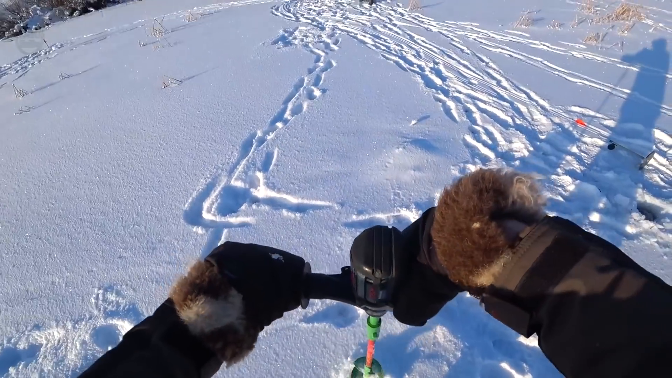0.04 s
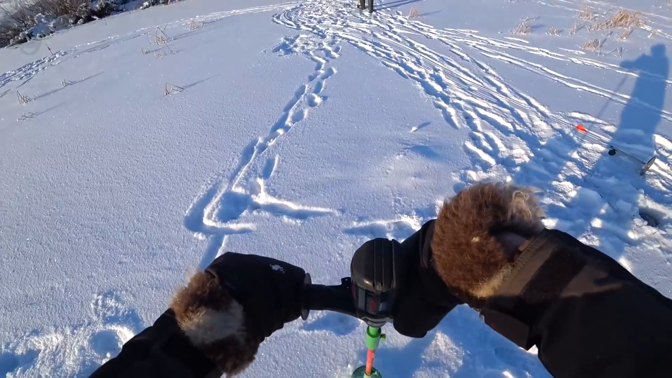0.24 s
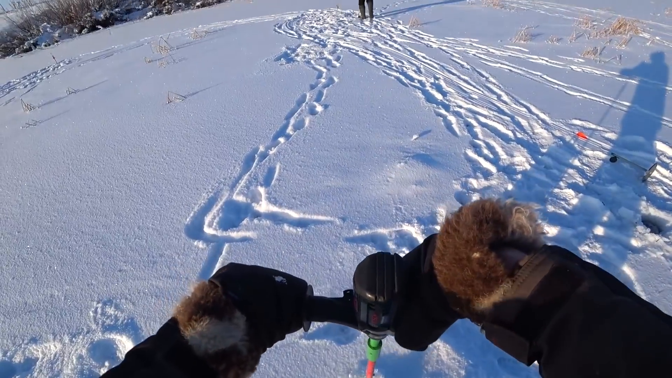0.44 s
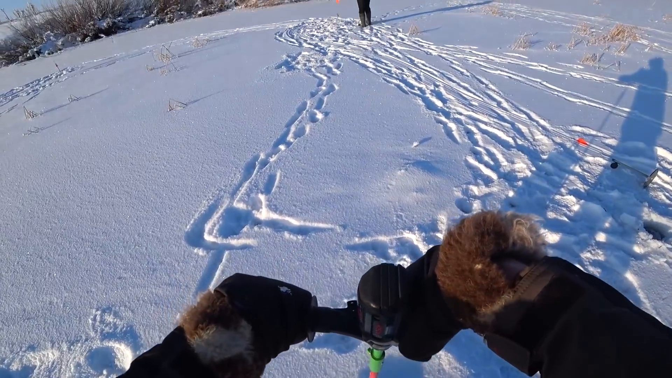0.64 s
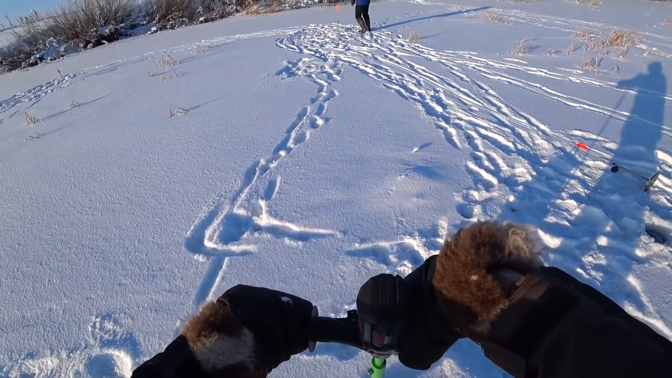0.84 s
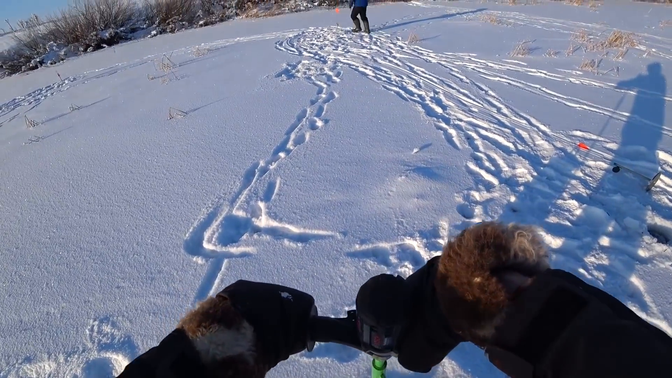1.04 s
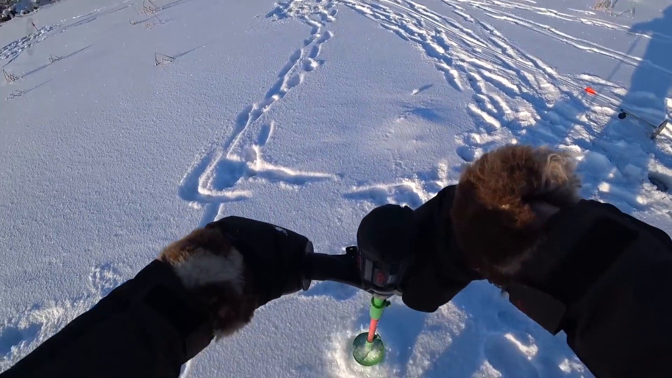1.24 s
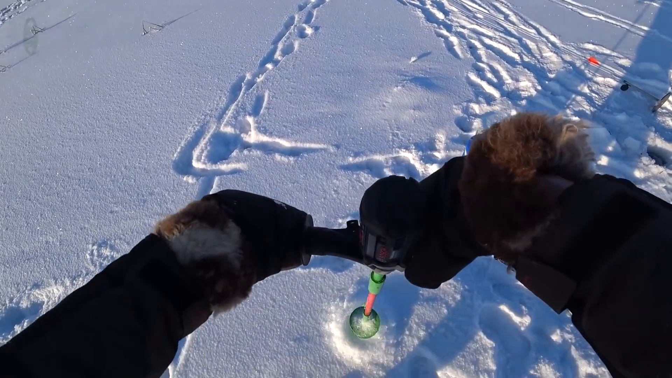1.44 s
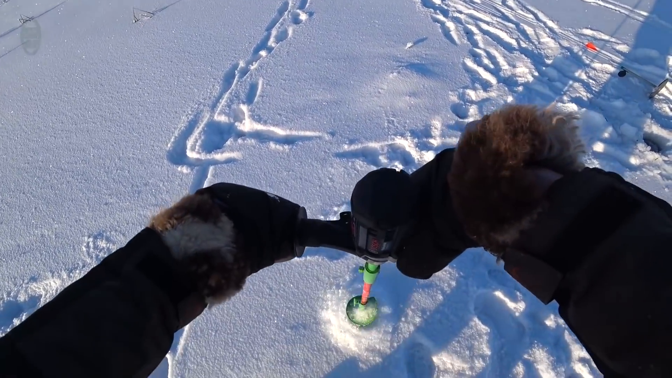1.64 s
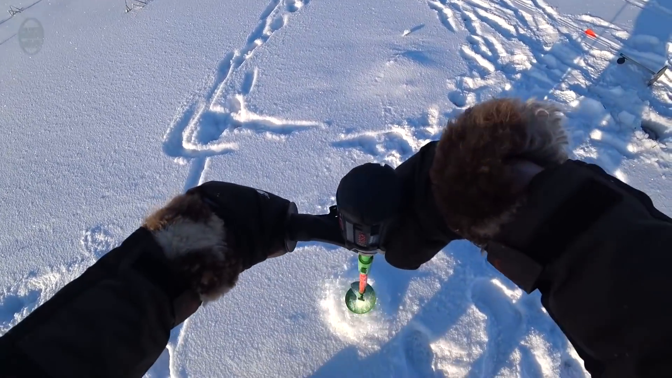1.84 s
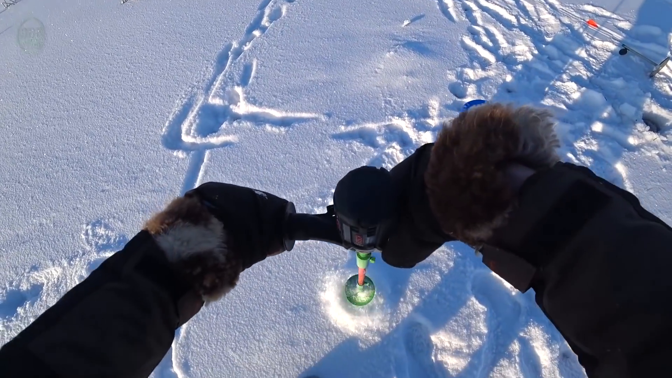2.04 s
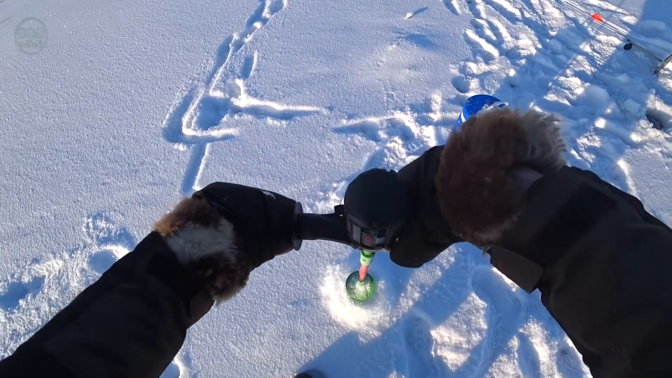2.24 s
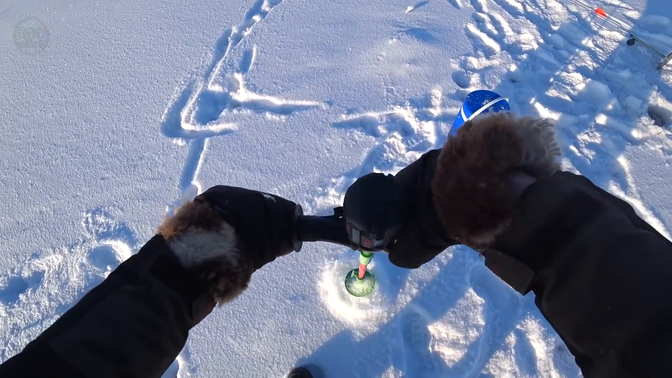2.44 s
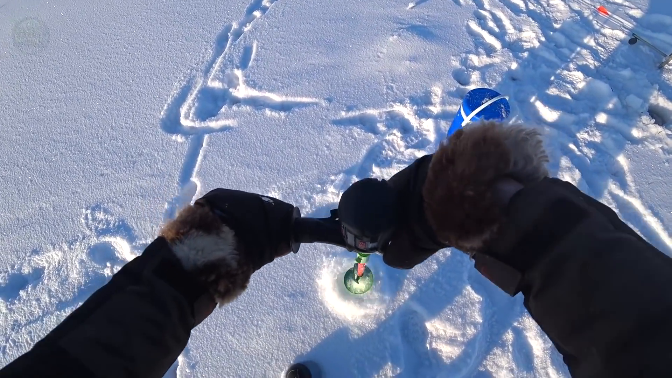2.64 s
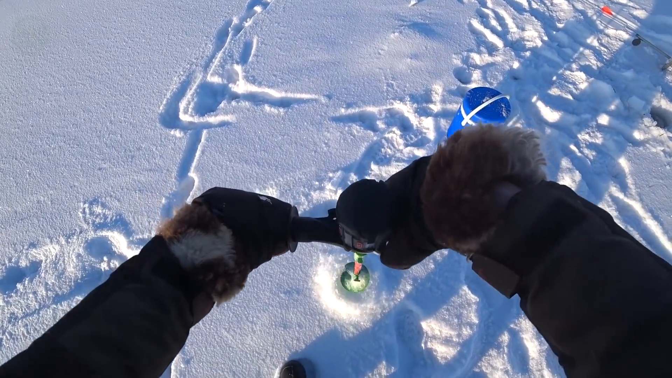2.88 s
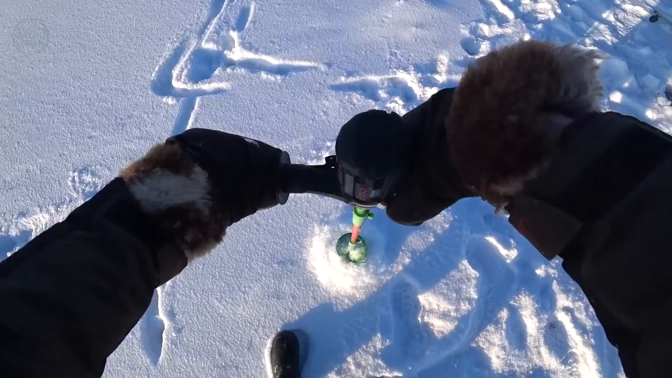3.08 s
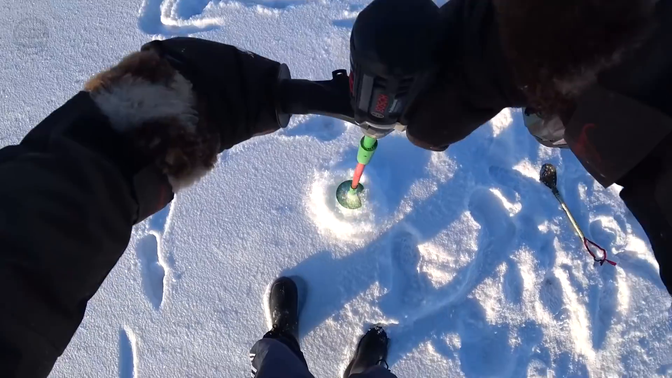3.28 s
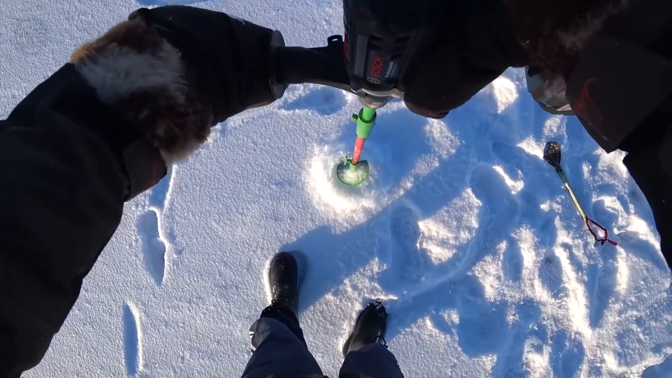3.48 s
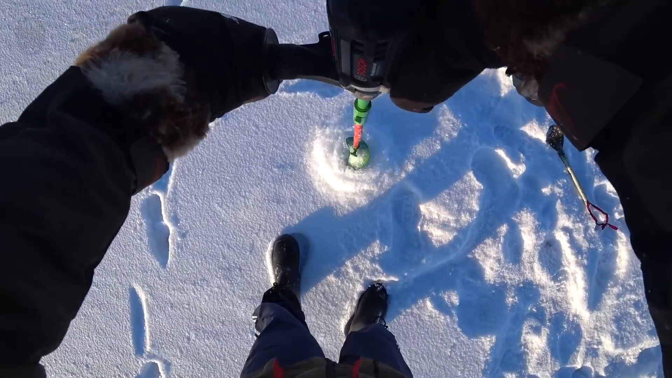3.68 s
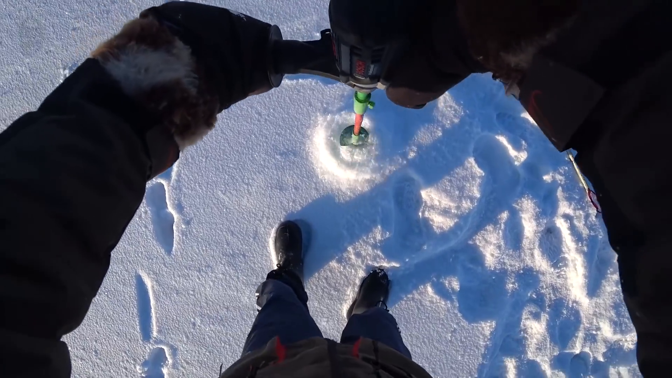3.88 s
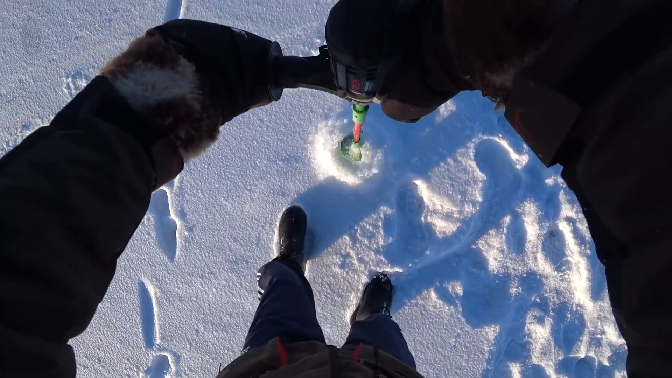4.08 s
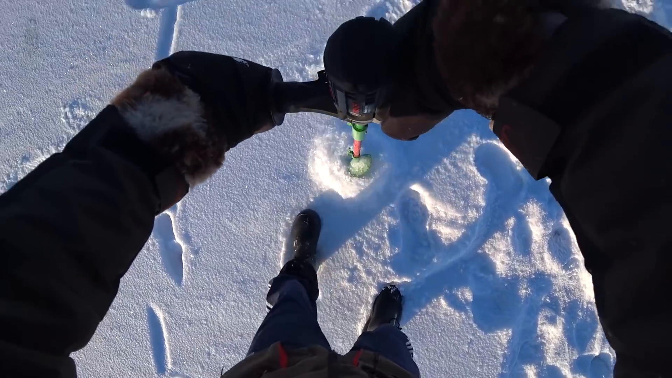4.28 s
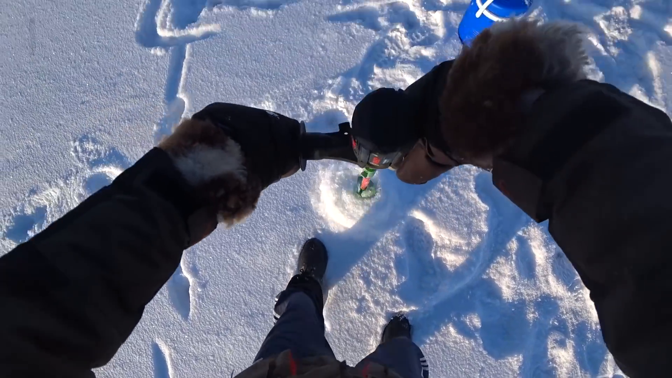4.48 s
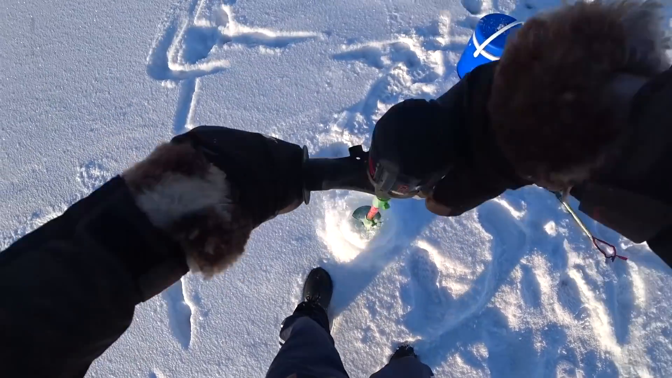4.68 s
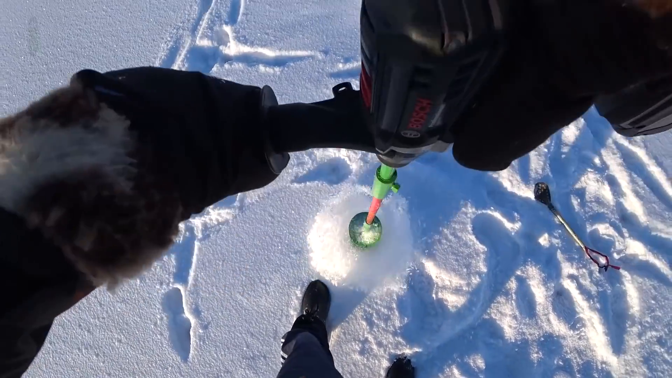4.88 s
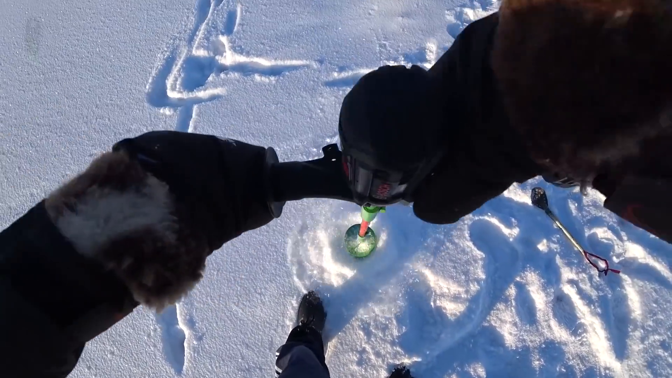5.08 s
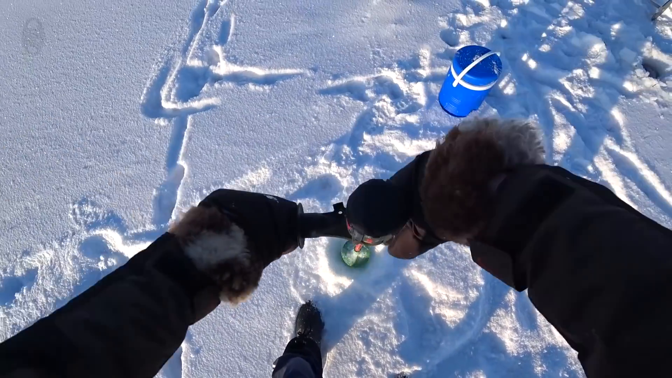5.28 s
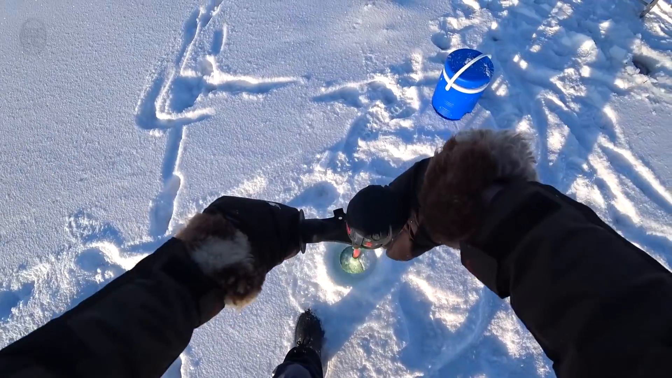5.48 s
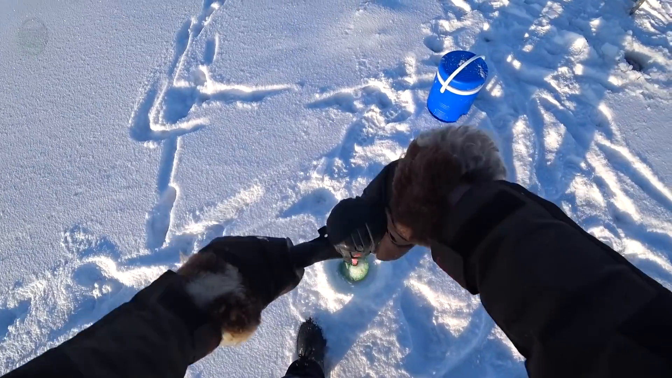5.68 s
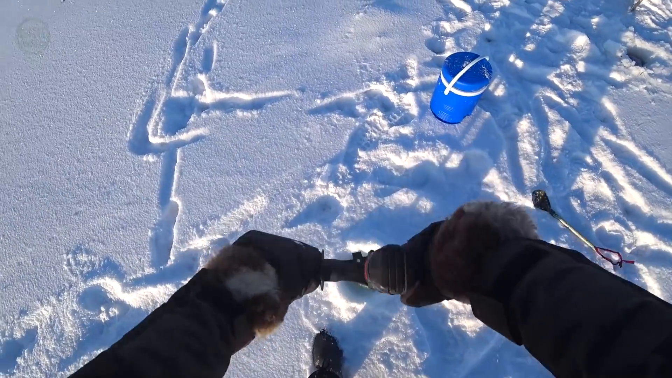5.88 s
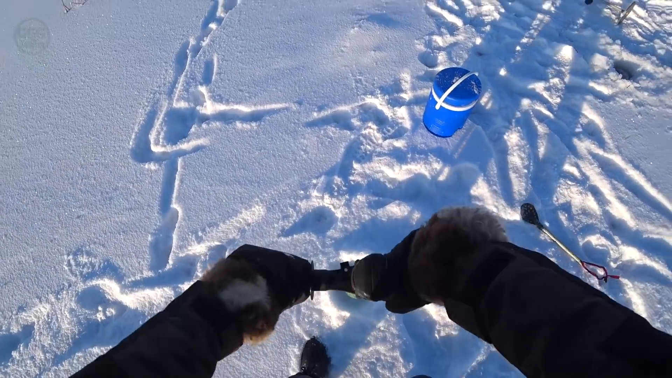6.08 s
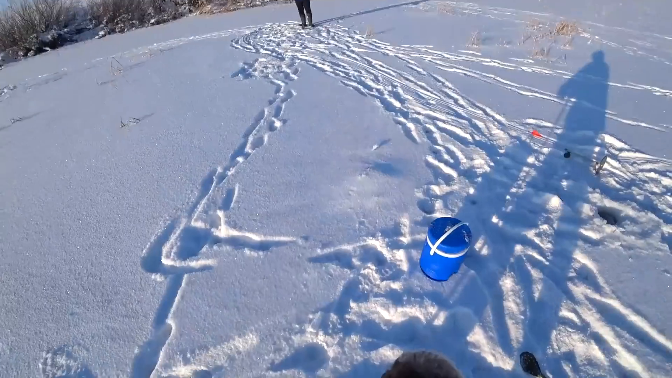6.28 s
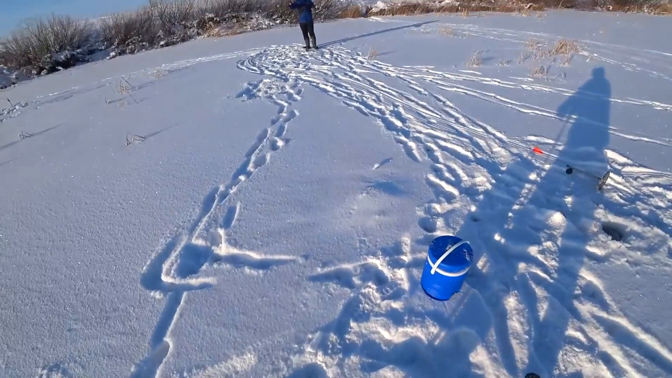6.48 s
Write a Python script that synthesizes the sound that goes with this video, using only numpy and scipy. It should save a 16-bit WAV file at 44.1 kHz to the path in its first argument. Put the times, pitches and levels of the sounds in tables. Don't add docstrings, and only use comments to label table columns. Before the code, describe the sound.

Close, gritty drilling into ice with a singing gear whine speeds up, drops and stops abruptly, leaving a short squeak, clicks and soft crunching snow.

```python
import sys
import numpy as np
from scipy import signal
from scipy.fft import rfft, irfft, next_fast_len
from scipy.io import wavfile
from scipy.ndimage import uniform_filter1d

SR = 44100
rng = np.random.default_rng(int(sys.argv[2]) if len(sys.argv) > 2 else 0)


def master_out(mix):
    frames = np.transpose(np.atleast_2d(mix))
    ceiling = np.clip(frames, -1, 1)
    pcm = np.round(ceiling * 32767).astype(np.int16)
    wavfile.write(sys.argv[1], SR, pcm)


def makeup_ratio(level_db):
    decades = np.asarray(level_db, float) / 20
    return 10 ** decades


N = 287964

# (frequency [Hz], level per Hz [dB])
WIND_COLOUR = [(8, 0), (22, -1), (45, -9), (90, -19), (180, -34), (400, -70)]
SHEET_COLOUR = [(50, -20), (90, -6), (128, 0), (165, -6), (215, -28)]
# (time [s], peak level [dB], length [s])
GUSTS = [(.08, -48, 0.1), (.34, -44, .03), (.7, -47, 0.095), (.92, -45, .06), (1.304, -42, .03),
         (1.5, -39, 0.037), (1.65, -46, .03), (1.75, -55, .04), (2.445, -43, 0.047), (2.942, -41, 0.051),
         (3.18, -51, .04), (3.497, -55, .1), (3.853, -41, .06), (4.09, -41, 0.14), (4.437, -40.5, 0.13),
         (4.634, -46, .03), (4.74, -32, 0.046), (4.86, -39, .05), (5.0, -43, .04), (5.173, -31, .03),
         (5.26, -26, .03), (5.358, -35, 0.035), (5.54, -41, 0.086), (5.86, -54, .04), (5.97, -45, 0.1),
         (6.4, -51, 0.11)]
BREEZE_DB, SHEET_DB = -61, -49.5

# (time [s], level [dB])
RUSTLE = [
    (5.75, -25),
    (5.775, -29.5),
    (6.015, -30.5),
    (6.1, -41.5),
    (6.27, -37),
    (6.33, -38),
    (6.385, -48),
    (6.42, -44),
    (6.53, -50),
]
# (frequency [Hz], level per Hz [dB])
SLUSH_COLOUR = [(59, -33), (100, -17), (671, -10), (1030, -15), (1440, -5), (1690, -5), (2360, -6.5),
                (2760, -6.5), (4510, -14), (5930, -32), (7360, -35), (8280, -29), (10900, -37),
                (14200, -72), (22000, -120)]
SNOW_COLOUR = [(59, -43), (100, -11), (167, -14), (199, -7), (312, 1), (403, -5), (770, -3.5), (1050, -11),
               (1190, -12), (2060, -16), (3230, -11.5), (4970, -22.5), (10900, -22), (14200, -55),
               (22000, -120)]
SETTLED_S = 6.06
RUSTLE_LOW_DB, RUSTLE_FIZZ_DB = (-9, -6.5), (-16.5, -18)

# (time [s], frequency [Hz], level [dB])
SQUEAK = [
    (5.81, 1960, -36),
    (5.83, 1930, -28),
    (5.88, 1830, -28),
    (5.91, 1770, -32),
]
# (time [s], peak level [dB], ring frequency [Hz], bright level [dB], low level [dB])
CLICKS = [(5.7194, -11, 3400, -19, -13), (5.7254, -5, 2220, -17, -23), (5.7533, -12, 1790, -18, -30),
          (5.7997, -8.5, 2730, -15.5, -47), (5.9036, -26, 2350, -12, -25), (5.9073, -10.5, 2420, -14, -38),
          (5.935, -17, 1460, -16.5, -25), (5.9552, -16, 2350, -27, -11), (5.999, -18, 2320, -32, -24),
          (6.021, -16.5, 1420, -30, -14), (6.044, -27, 3180, -28, -6), (6.274, -29, 3780, -25, -3),
          (6.304, -32, 2300, -24, -4), (6.3277, -23, 3600, -14, -20), (6.344, -29.5, 2070, -26, -6),
          (6.3997, -23.5, 3180, -30, -32), (6.404, -26, 3250, -27, -31), (6.448, -29, 3270, -27, -25),
          (6.472, -39, 3700, -27, -6)]
CLICK_S = 0.003
JOLT_S, JOLT_DB, JOLT_HZ, JOLT_LENGTH_S = 5.742, -28, 100, 0.011
CATCH_S, CATCH_LENGTH_S, CATCH_HZ, CATCH_DB = 5.07, 0.013, 2650, -16

# (time [s], speed [Hz])
MOTOR = [(0, 259.5), (1.2, 255.8), (1.95, 250.3), (4.27, 248.8), (4.375, 243), (4.44, 248.5), (4.56, 252.6),
         (4.605, 258), (4.68, 281), (4.8, 293.4), (4.97, 299.3), (5.0, 293.5), (5.1, 298.9), (5.325, 303.3),
         (5.37, 287.5), (5.42, 286.5), (5.52, 259.5), (5.7, 250.3)]
FREE_FROM_HZ, FREE_AT_HZ = 260, 280
BRAKE_S, STOP_S, BRAKE_HZ, BRAKE_DB = 5.7, 5.755, 50, -10
# (time [s], depth of hole [0-1])
BORE = [
    (0, 0.1),
    (1.13, 0.13),
    (1.35, 0.56),
    (2.95, 0.61),
    (3.15, 0.91),
    (4.5, 0.86),
    (4.64, .7),
    (5.42, 0.72),
    (5.75, 0.65),
]

# (frequency [Hz], level per Hz [dB])
SHALLOW_COLOUR = [(140, -28), (240, -38.5), (341, -15), (559, -14.5), (1010, -13), (1280, -14.5),
                  (1910, -8), (2550, 0.5), (3240, -7), (3740, -5.5), (4390, -14.5), (7200, -29),
                  (8310, -25), (10900, -27), (14200, -60), (22000, -120)]
DEEP_COLOUR = [(120, -18), (200, -21.5), (432, -8.5), (528, -17), (593, -11), (815, -18), (1460, -9.5),
               (2120, -12.5), (2810, -8), (3010, -8), (3670, -8), (7060, -22), (8200, -22.5), (10900, -26),
               (14200, -62), (22000, -120)]
UNLOADED_COLOUR = [(120, -54), (200, -24), (299, -19.5), (454, -15.5), (750, -15), (1070, -9.5),
                   (1390, -4.5), (1490, -3), (2080, -2), (2910, 1), (4130, -5), (5770, -8), (7170, -17),
                   (9070, -12.5), (10900, -16.5), (14200, -50), (22000, -120)]
# (frequency [Hz], width [Hz], level [dB])
HOUSING = [(2358, 40, 4.5), (2553, 51, 1.5), (3600, 130, 3), (6920, 160, -3.5), (5400, 41, 3.5),
           (5860, 150, 4), (6600, 130, 3.5), (8130, 210, 4.5)]
# (time [s], level [dB])
SCRAPES = [
    (5.0, 1.8),
    (5.075, 2),
    (5.15, 3.8),
    (5.35, 3.5),
    (5.73, 2),
]
SCRAPE_S = 0.019
GRIND_DB, GRIND_DEEP_DB, GRIND_FREE_DB = -14.5, -1, -3.5
GRIND_STOP_S, GRIND_STOP_DB_PER_S = 5.748, -1200
HOLLOW_DB, HOLLOW_DEEP_DB, HOLLOW_FREE_DB = -12.5, -5, 4
FIZZ_DB, FIZZ_DEEP_DB, FIZZ_FREE_DB = -15.5, 4, 5
SPRAY_S, SPRAY_LENGTH_S, SPRAY_DB = 4.83, 0.043, 5.2
GRIND_SIZE, GRIND_HOP = 512, 128

# (multiple of rotor speed, level under load [dB], level running free [dB])
MESH = [(11.41, 0, 0), (10.5, -11, -10), (22.82, -30, -30)]
FIFTEENTH = [(15, 0, 1), (16, -16, -13), (14, -20, -13), (17, -20, -14), (23, -15, -23)]
TWENTIETH = [(20, -17, -6)]
TENTH = [(10, 0, 0), (31, -30, -19), (13, -22, -13), (19, -25, -18), (30, -19, -18)]
SECOND_STAGE = [(2.38, 0, 0)]
PLANETS = [(14.08, 1.5, -20), (2.65, -14, -30)]
FAINT = [(1, -62, -46), (4, -47, -45), (5, -45, -34), (6, -42, -55), (21, -47, -60), (22, -58, -45),
         (24, -51, -55), (26, -54, -54), (27, -60, -53), (30, -60, -43), (35, -65, -52), (36, -65, -51)]
MESH_DB, MESH_DEEP_DB, MESH_FREE_DB = -37.5, 9.5, -43
SEATED_S, SEATED_DB = 1.15, 8
WHINE_DB, WHINE_FREE_DB = -34, -24.5
BEAT_DB, BEAT_S, BEAT_TOP_S = 3, 1.57, 0.95
LULL_S, BITE_S, LULL_DB = 5.04, 5.315, -13
HUM_DB, HUM_DEEP_DB, HUM_BITE_DB = -29.5, -3.5, -10
HUM_TOP_DB, HUM_DB_PER_HZ, FULL_HZ = -21.5, 0.8, 295
PLANET_DB, PLANET_DEEP_DB, PLANET_FREE_DB = -32, -5, -12
# (start [s], end [s], level [dB])
STAGE = [
    (2.45, 4.555, -42),
    (5.39, 5.757, -38),
]
STAGE_REST_DB, STAGE_RISE_S = -78, 0.027

# (frequency [Hz], left-right likeness [0-1])
SAME = [(40, .955), (250, 0.94), (1000, 0.97), (2500, 0.84), (5000, 0.8), (11000, 0.96)]
# (frequency [Hz], phase by which left leads [rad])
LEAD = [(30, -.05), (125, -.4), (250, -.75), (600, -1.1), (1030, -1.2), (5000, -.55), (6890, -1),
        (7750, -.5), (9220, -.15)]
# (frequency [Hz], left-right level [dB])
LEAN = [(60, -0.5), (170, 0), (480, 0.0), (1370, -0.5), (3880, -1.0), (11000, -2)]
# (frequency [Hz], level [dB])
EDGE = [(11020, 0), (11070, -18), (11400, -55)]
CEILING = 0.95


def evened(x):
    return x / np.sqrt(np.mean(x ** 2) + 1e-20)


def read(points, hz):
    f, value = np.transpose(points)
    return np.interp(np.log(hz + 1), np.log(f + 1), value)


def columns(rows, t):
    s, *rest = np.transpose(rows)
    return [np.interp(t, s, c) for c in rest]


def ramp(t, start, length):
    return np.clip((t - start) / length, 0, 1)


def bump(t, s, length):
    return np.exp(-((t - s) / length) ** 2)


def smoothed(x, span):
    return uniform_filter1d(uniform_filter1d(x, span), span)


def drift(count, span):
    return evened(smoothed(rng.standard_normal(count), span))


def patches(shape, bands, frames):
    noise = rng.standard_normal(shape[::-1]).T
    noise = uniform_filter1d(uniform_filter1d(noise, bands, 0), frames, 1)
    return evened(noise)


def axes(size, hop):
    return np.arange(N // hop + 5) * hop / SR, np.fft.rfftfreq(size, 1 / SR)


def hiss(field_db, size, hop):
    a, b, c, d = rng.standard_normal((field_db.shape[1], field_db.shape[0], 4)).T
    same = np.clip(read(SAME, np.fft.rfftfreq(size, 1 / SR)), 0, 1)[:, None]
    left = a + 1j * b
    right = same * left + np.sqrt(1 - same ** 2) * (c + 1j * d)
    z = np.array([left, right]) * makeup_ratio(field_db)
    white = np.sqrt(size * size / hop) / 1.6
    return signal.istft(z, nperseg=size, noverlap=size - hop)[1][:, :N] / white


def banded(colour_db, level_db, low_db, fizz_db, hz):
    power = makeup_ratio(colour_db) ** 2
    bands = (hz > 200) & (hz < 1200), (hz >= 1200) & (hz < 5000), hz >= 5000
    low, middle, high = [10 * np.log10(power[band].sum(0)) for band in bands]
    below = (1 / (1 + (hz / 1100) ** 4))[:, None]
    above = (1 / (1 + (5200 / (hz + 1)) ** 6))[:, None]
    lean = below * (low_db - low + middle) + above * (fizz_db - high + middle)
    return colour_db + lean + level_db - middle + 10 * np.log10(len(hz))


def running(t):
    speed = columns(MOTOR, t)[0] - BRAKE_HZ * ramp(t, BRAKE_S, STOP_S - BRAKE_S) ** 2
    free = ramp(speed, FREE_FROM_HZ, FREE_AT_HZ - FREE_FROM_HZ)
    return speed, free, np.clip(columns(BORE, t)[0], 0, 1)


def wind():
    t, hz = axes(2048, 512)
    flow = hiss(np.outer(read(WIND_COLOUR, hz), np.ones(len(t))), size=2048, hop=512)
    steady = flow / np.sqrt(smoothed((flow ** 2).mean(0), 2500))
    t = np.arange(N) / SR
    return steady * (makeup_ratio(BREEZE_DB) + sum(makeup_ratio(db) * bump(t, s, length) for s, db, length in GUSTS))


def sheet():
    t, hz = axes(2048, 512)
    lumps_db = 2.5 * drift(count=len(t), span=5) - 7 * (t > SETTLED_S)
    return makeup_ratio(SHEET_DB) * evened(hiss(read(SHEET_COLOUR, hz)[:, None] + lumps_db, size=2048, hop=512))


def rustle():
    t, hz = axes(256, 64)
    level_db = columns(RUSTLE, t)[0]
    chips = t < SETTLED_S
    low_db = np.where(chips, *RUSTLE_LOW_DB) - 0.3
    fizz_db = np.where(chips, *RUSTLE_FIZZ_DB)
    fizz_db = fizz_db + 0.28 * (level_db + 37) * (t > SETTLED_S)
    colour = np.where(chips, read(SLUSH_COLOUR, hz)[:, None], read(SNOW_COLOUR, hz)[:, None])
    clumps_db = 2.8 * patches(colour.shape, bands=9, frames=5) + 1.6 * drift(count=len(t), span=3)
    field = banded(colour, level_db + 8.5, low_db, fizz_db, hz) + clumps_db
    return hiss(field - 90 * (t < RUSTLE[0][0]), size=256, hop=64)


def squeak():
    t = np.arange(N) / SR
    hz, db = columns(SQUEAK, t)
    turn = 2 * np.pi * np.cumsum(hz * (1 + 0.012 * drift(count=N, span=60))) / SR
    touching = (t > SQUEAK[0][0]) * (t < SQUEAK[-1][0])
    rub = makeup_ratio(db + 3 * drift(count=N, span=100)) * touching
    return rub * (np.cos(turn) + 0.29 * np.cos(turn / 4))


def clicks():
    out, t = np.zeros(N + SR), np.arange(2000) / SR
    bright = signal.butter(2, 4500, "high", fs=SR)
    shape = 2.5 * t / CLICK_S * np.exp(1 - 2.5 * t / CLICK_S)
    for s, db, hz, bright_db, low_db in CLICKS:
        wobble, noise = rng.standard_normal((len(t), 2)).T
        ring_hz = hz * (1 + 0.9 * uniform_filter1d(wobble, size=12))
        ring = np.sin(2 * np.pi * np.cumsum(ring_hz) / SR)
        tick = makeup_ratio(2 * bright_db + 26.0) * signal.lfilter(*bright, noise)
        push = makeup_ratio(low_db + 10.5) * np.sin(2 * np.pi * 520 * t) * shape ** 0.7
        out[round(s * SR):][:len(t)] += makeup_ratio(db - 4.0) * ((ring + tick) * shape + push)
    t = np.arange(N) / SR - JOLT_S
    return out[:N] + makeup_ratio(JOLT_DB) * bump(t, 0, JOLT_LENGTH_S) * np.sin(2 * np.pi * JOLT_HZ * t)


def catch():
    t = np.arange(N) / SR
    turn = 2 * np.pi * np.cumsum(CATCH_HZ * (1 + 0.05 * drift(count=N, span=40))) / SR
    return makeup_ratio(CATCH_DB) * bump(t, CATCH_S, CATCH_LENGTH_S) * np.cos(turn)


def grind():
    t, hz = axes(GRIND_SIZE, GRIND_HOP)
    speed, free, depth = running(t)
    level_db = GRIND_DB + GRIND_DEEP_DB * depth + GRIND_FREE_DB * free
    level_db = level_db + GRIND_STOP_DB_PER_S * np.maximum(t - GRIND_STOP_S, 0)
    scrape_db = sum(db * bump(t, s, SCRAPE_S) for s, db in SCRAPES)
    low_db = scrape_db / 2 + HOLLOW_DB + HOLLOW_DEEP_DB * depth + HOLLOW_FREE_DB * free
    spray_db = SPRAY_DB * bump(t, SPRAY_S, SPRAY_LENGTH_S)
    fizz_db = FIZZ_DB + FIZZ_DEEP_DB * depth + FIZZ_FREE_DB * free + spray_db - scrape_db / 2

    rings = sum(db * np.exp(-0.5 * ((hz - f) / width) ** 2) for f, width, db in HOUSING)
    loaded = np.outer(read(SHALLOW_COLOUR, hz), 1 - depth) + np.outer(read(DEEP_COLOUR, hz), depth)
    colour = (loaded + rings[:, None]) * (1 - free) + np.outer(read(UNLOADED_COLOUR, hz), free)

    patches_db = 0.6 * patches(colour.shape, bands=7, frames=24)
    flurry = 0.2 * drift(count=len(t), span=9) + 0.8 * drift(count=len(t), span=3)
    reach_db = np.clip(0.58 + hz / 8000, 0, 1.3)
    field = banded(colour, level_db + scrape_db + 4.5, low_db, fizz_db, hz)
    return hiss(field + patches_db + np.outer(reach_db, flurry), size=GRIND_SIZE, hop=GRIND_HOP)


def gear_levels(t):
    speed, free, depth = running(t)
    loose, biting = np.minimum(2 * free, 1), ramp(t, BITE_S, 0.015)
    brake = BRAKE_DB * ramp(t, BRAKE_S, STOP_S - BRAKE_S)

    mesh_loaded = MESH_DB + MESH_DEEP_DB * depth ** 2 + SEATED_DB * ramp(t, SEATED_S, 0.12)
    mesh = (1 - loose * free) * mesh_loaded + loose * free * MESH_FREE_DB

    beat = BEAT_DB * np.cos(2 * np.pi * (t - BEAT_TOP_S) / BEAT_S)
    lull = LULL_DB * ramp(t, LULL_S, BITE_S - LULL_S) ** 0.7 * (1 - biting)
    whine = (1 - loose) * (WHINE_DB + beat) + loose * WHINE_FREE_DB + lull

    idle = HUM_TOP_DB - HUM_DB_PER_HZ * np.maximum(FULL_HZ - speed, 0) + HUM_BITE_DB * biting * free
    hum = (1 - loose) * (HUM_DB + HUM_DEEP_DB * depth) + loose * idle
    twentieth = whine + loose * (idle - HUM_TOP_DB)

    stage = STAGE_REST_DB
    for start, end, db in STAGE:
        singing = ramp(t, start, STAGE_RISE_S) * ramp(-t, -end, STAGE_RISE_S)
        stage = stage + (db - STAGE_REST_DB) * singing
    planets = PLANET_DB + PLANET_DEEP_DB * depth ** 4 + PLANET_FREE_DB * loose
    return mesh + brake, whine + brake, twentieth, hum + brake, stage, planets, 0


def motor():
    t = np.arange(N) / SR
    speed, free, depth = running(t)
    shake = (0.0018 + 0.0025 * depth ** 2 * (1 - free)) * drift(count=N, span=1000)
    shake = shake + 0.0008 * drift(count=N, span=90)
    turns = np.cumsum(speed * (1 + shake)) / SR
    coarse = t[::64]
    out = np.zeros(N)
    families = MESH, FIFTEENTH, TWENTIETH, TENTH, SECOND_STAGE, PLANETS, FAINT
    for family, level_db in zip(families, gear_levels(t)):
        for k, load_db, free_db in family:
            waver = (0.6 + k / 14) * drift(count=len(coarse), span=8)
            waver_db = np.interp(t, coarse, waver)
            partial_db = level_db + load_db + free * (free_db - load_db) + waver_db
            out += makeup_ratio(partial_db + 0.5) * np.cos(2 * np.pi * (k * turns + rng.random()))
    return np.sqrt(2) * out * np.clip((STOP_S - t) / 0.011, 0, 1)


def scene():
    return wind() + sheet() + rustle() + squeak() + clicks() + catch() + grind() + motor()


def low_pass(x):
    return signal.sosfilt(signal.butter(12, 11590, fs=SR, output="sos"), x)


def record(dry):
    size = next_fast_len(N + GRIND_SIZE)
    hz = np.fft.rfftfreq(size, 1 / SR)
    half = makeup_ratio(read(LEAN, hz) / 2) * np.exp(0.5j * read(LEAD, hz))
    ports = irfft(rfft(dry, size) * [half, 1 / half], size)
    rounded = ports / (1 + (ports / CEILING) ** 4) ** 0.25
    limited = irfft(rfft(rounded) * makeup_ratio(read(EDGE, hz)), size)[:, :N]
    return low_pass(limited)


dry = scene()
out = record(dry)
master_out(out)
```